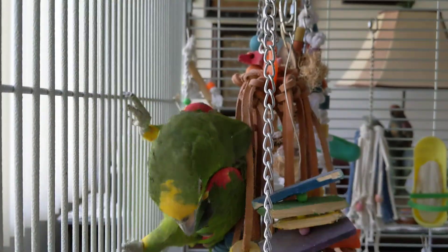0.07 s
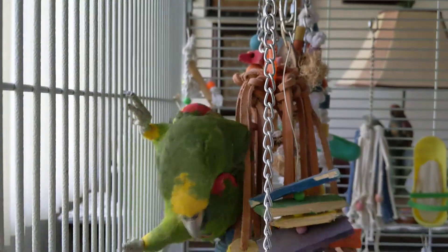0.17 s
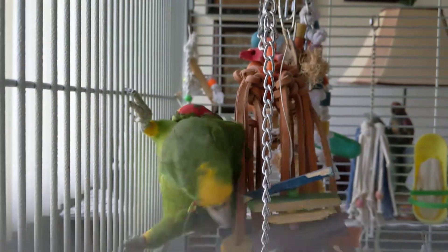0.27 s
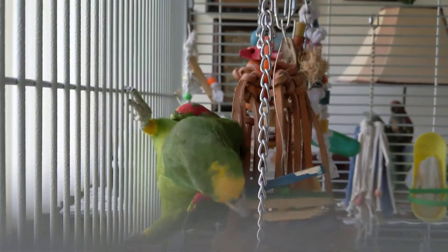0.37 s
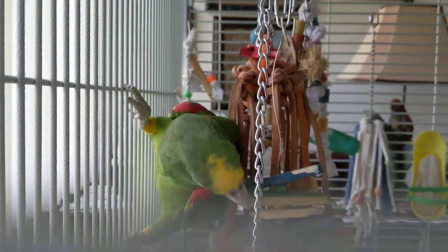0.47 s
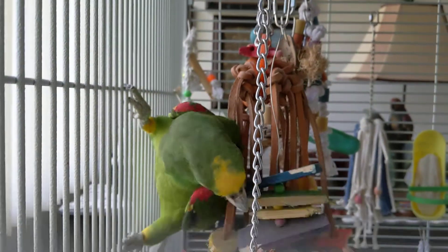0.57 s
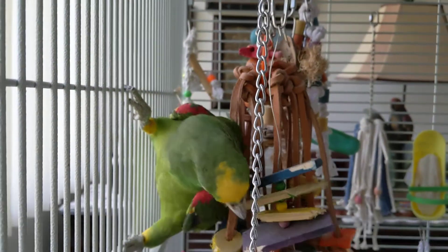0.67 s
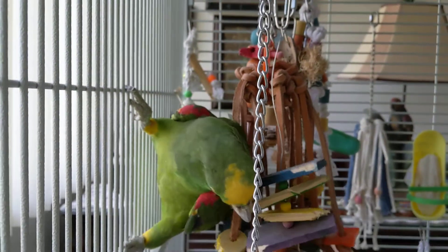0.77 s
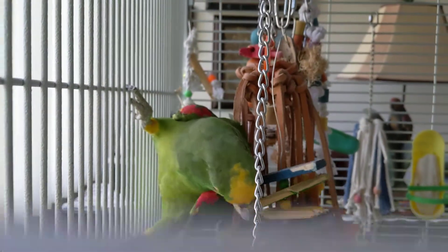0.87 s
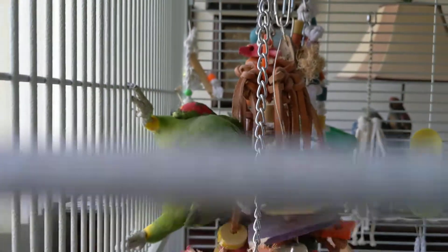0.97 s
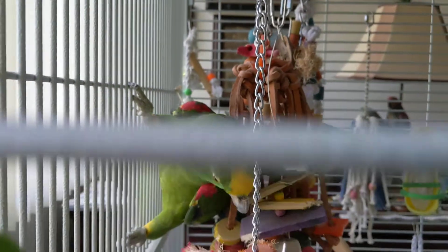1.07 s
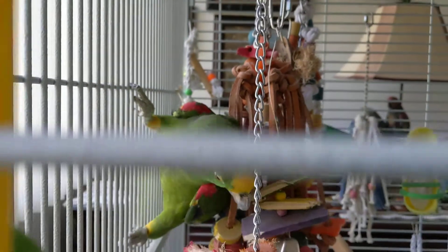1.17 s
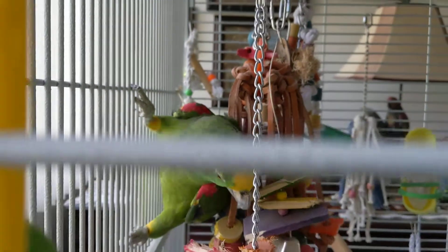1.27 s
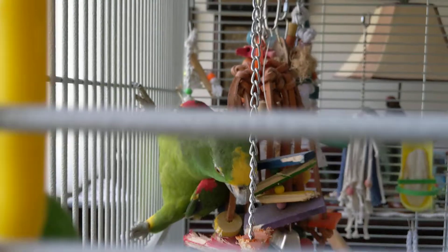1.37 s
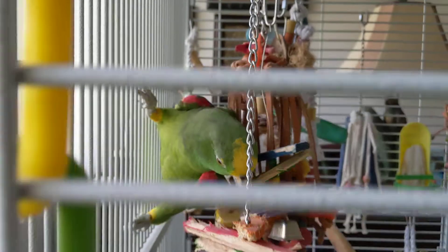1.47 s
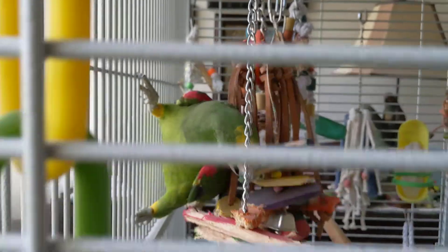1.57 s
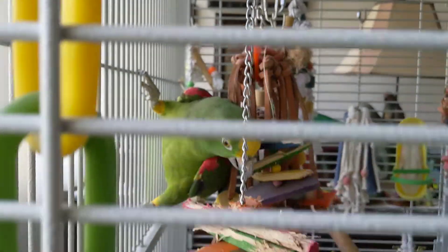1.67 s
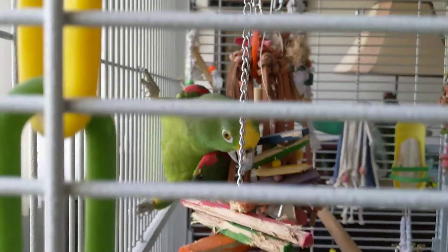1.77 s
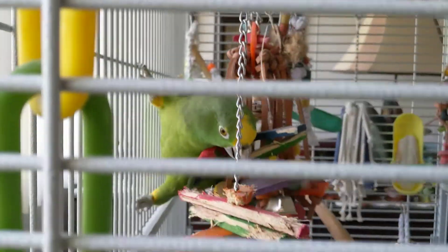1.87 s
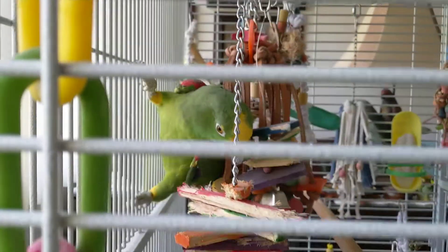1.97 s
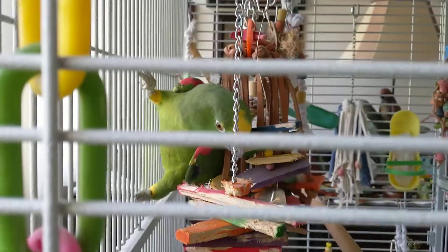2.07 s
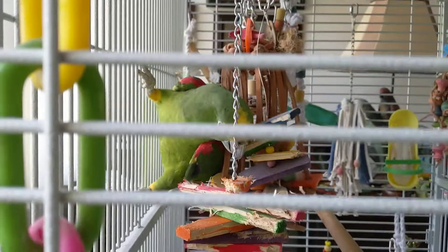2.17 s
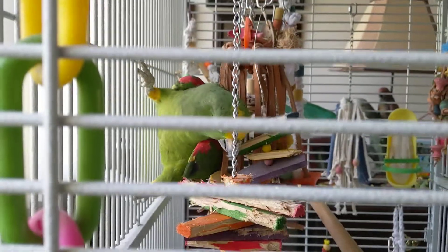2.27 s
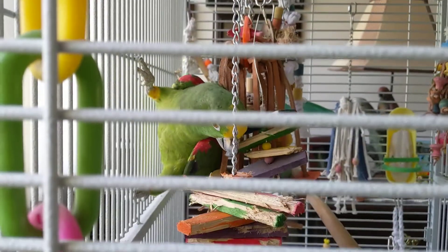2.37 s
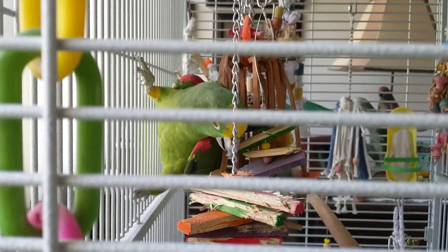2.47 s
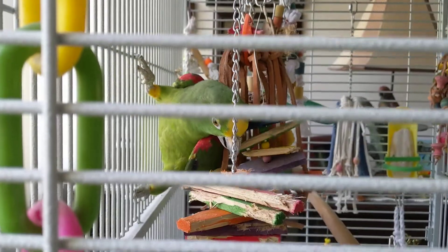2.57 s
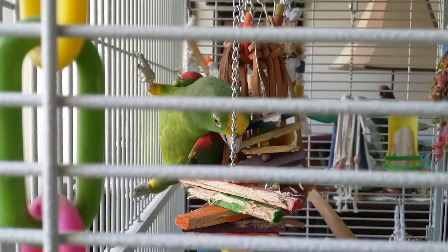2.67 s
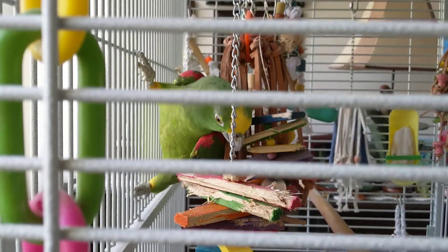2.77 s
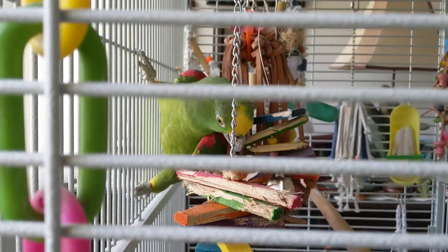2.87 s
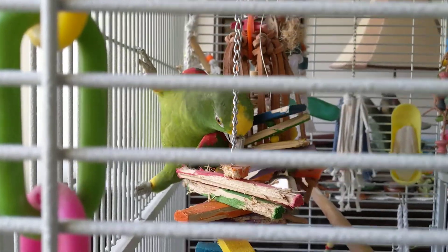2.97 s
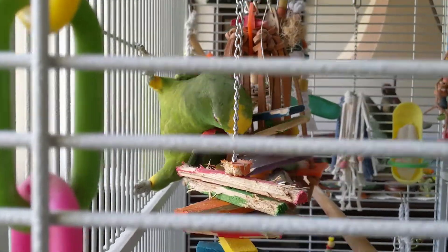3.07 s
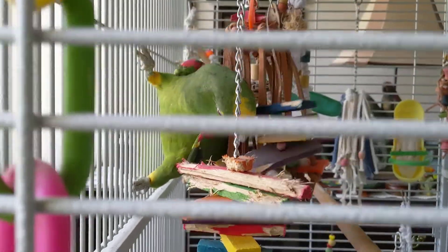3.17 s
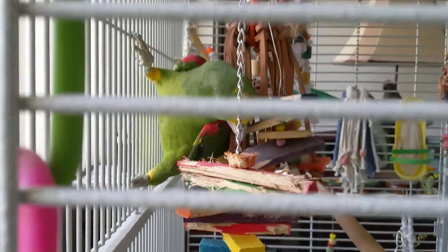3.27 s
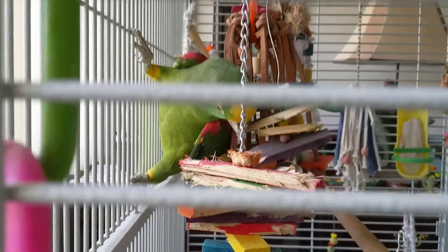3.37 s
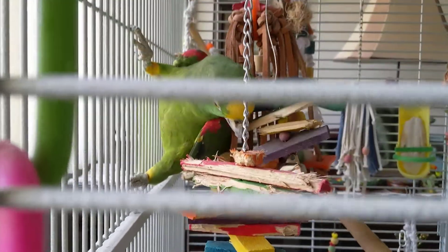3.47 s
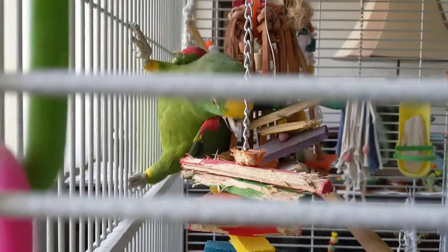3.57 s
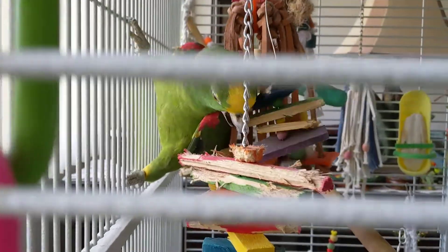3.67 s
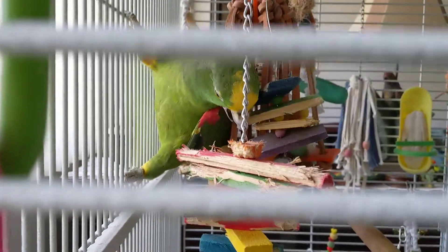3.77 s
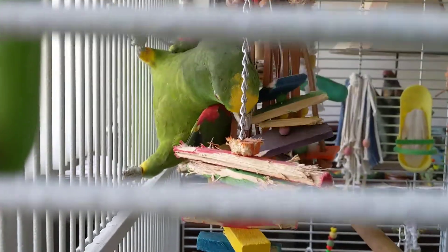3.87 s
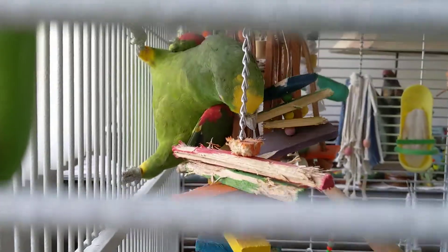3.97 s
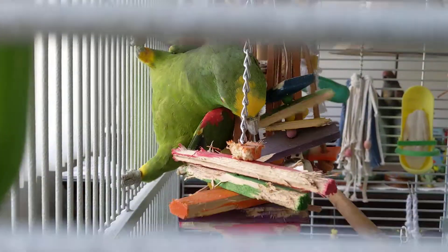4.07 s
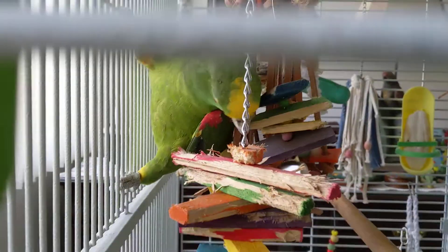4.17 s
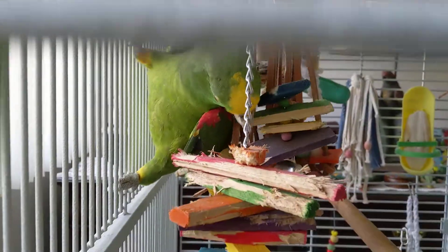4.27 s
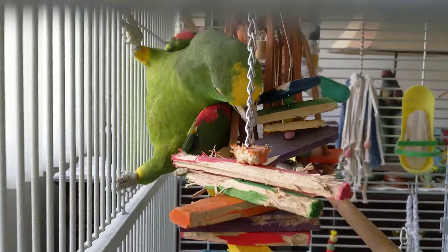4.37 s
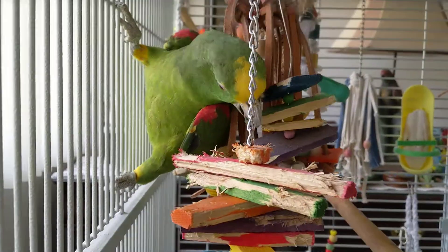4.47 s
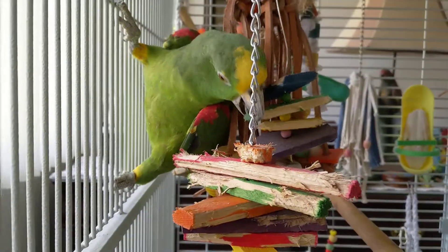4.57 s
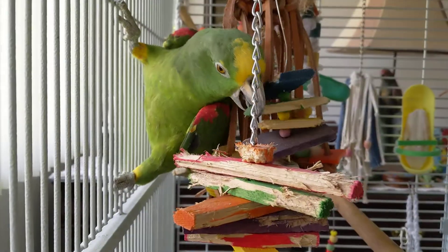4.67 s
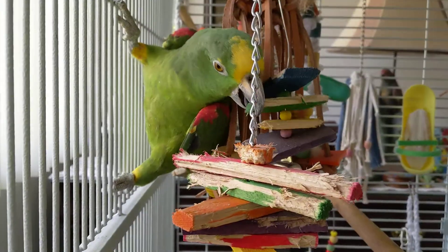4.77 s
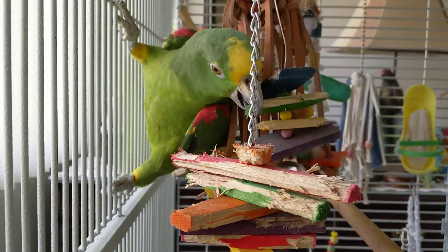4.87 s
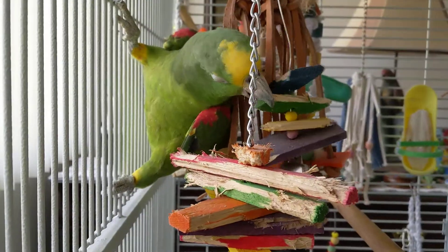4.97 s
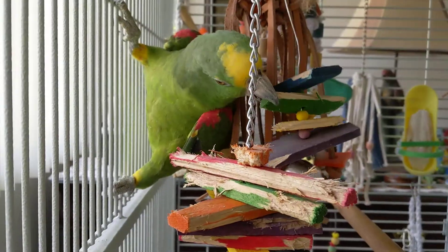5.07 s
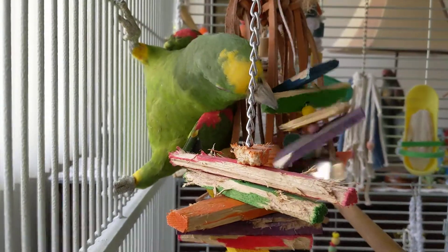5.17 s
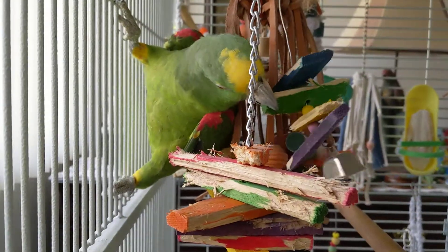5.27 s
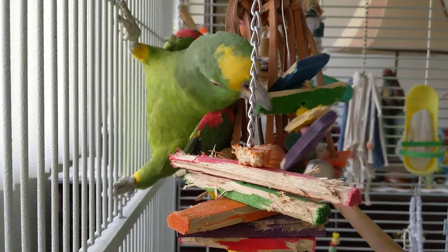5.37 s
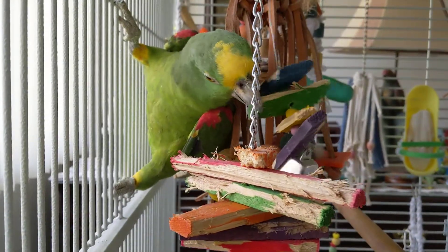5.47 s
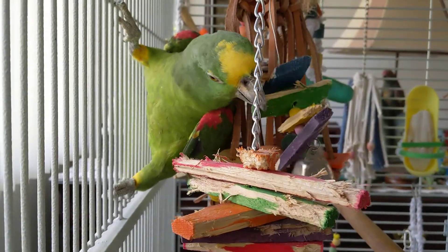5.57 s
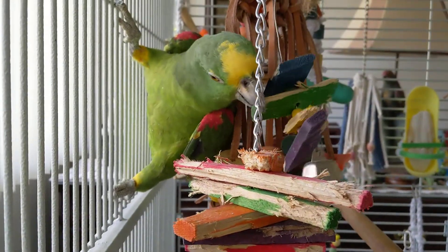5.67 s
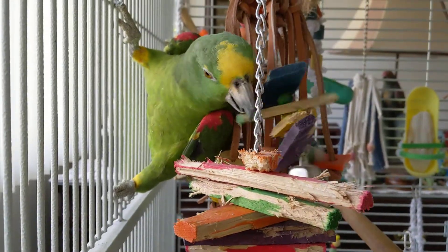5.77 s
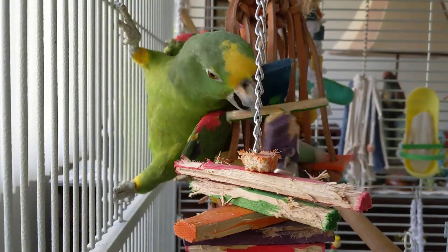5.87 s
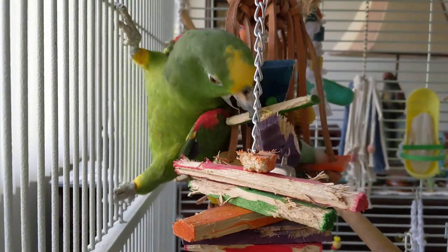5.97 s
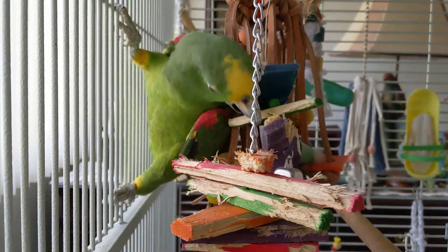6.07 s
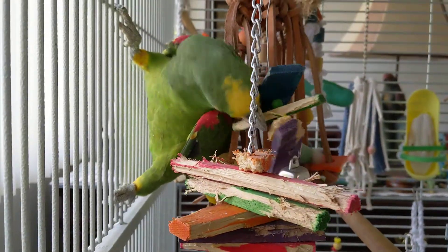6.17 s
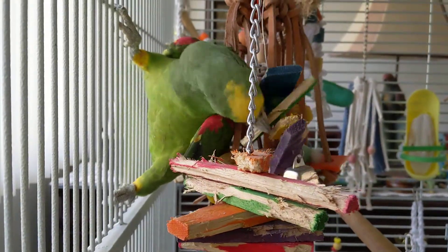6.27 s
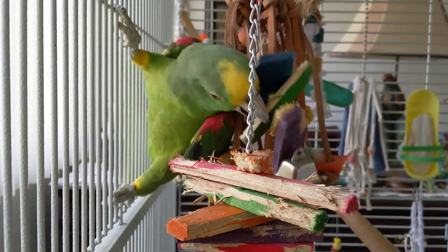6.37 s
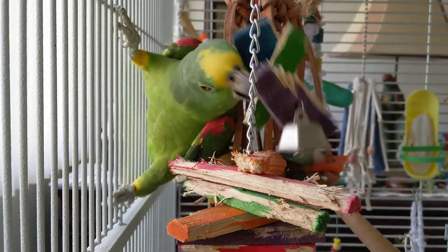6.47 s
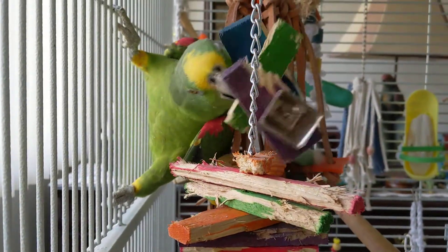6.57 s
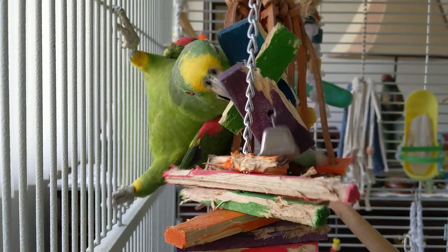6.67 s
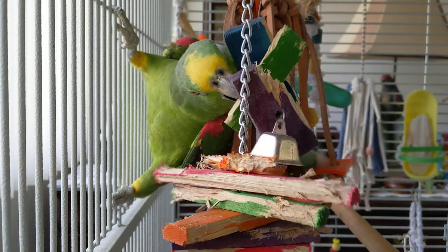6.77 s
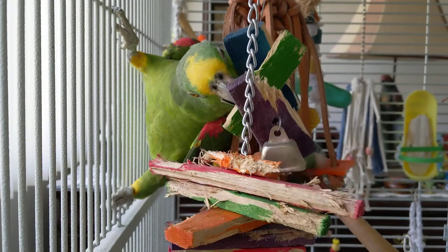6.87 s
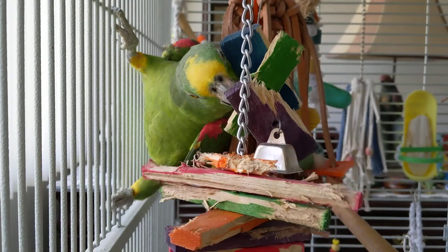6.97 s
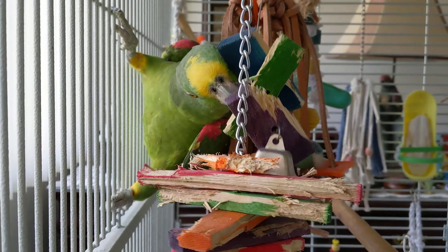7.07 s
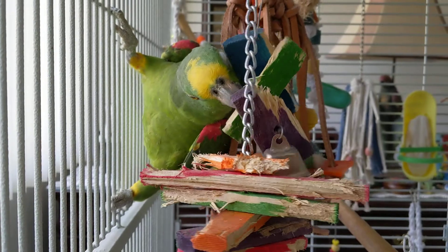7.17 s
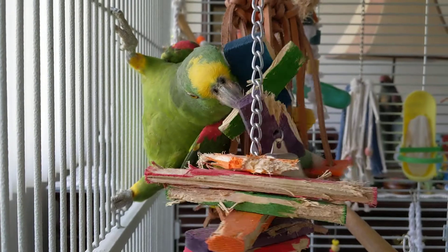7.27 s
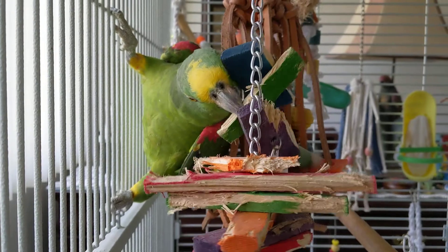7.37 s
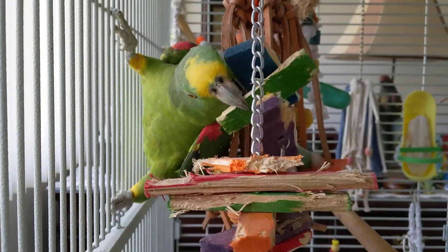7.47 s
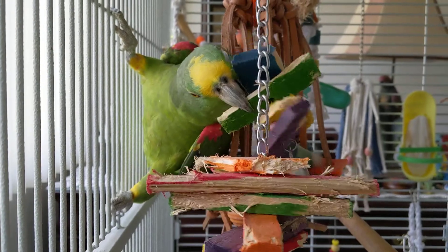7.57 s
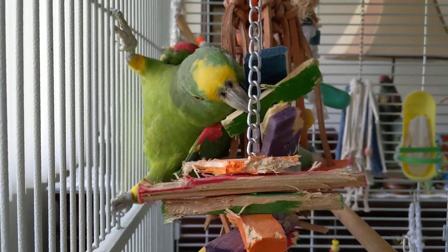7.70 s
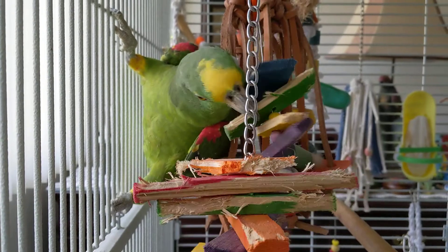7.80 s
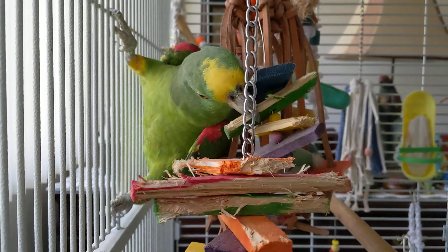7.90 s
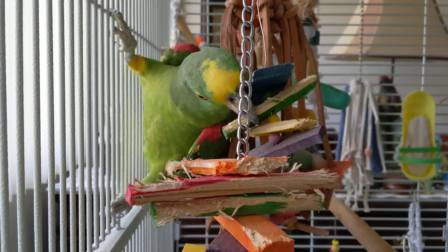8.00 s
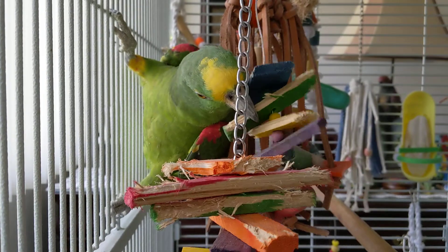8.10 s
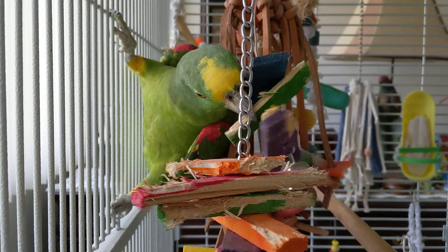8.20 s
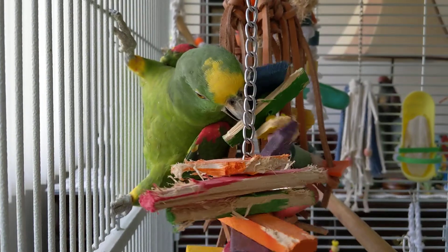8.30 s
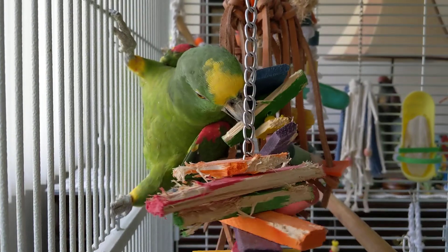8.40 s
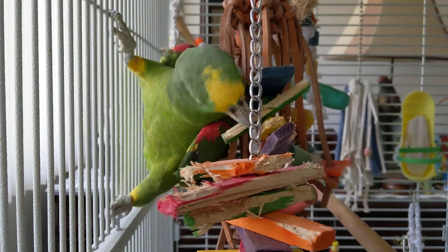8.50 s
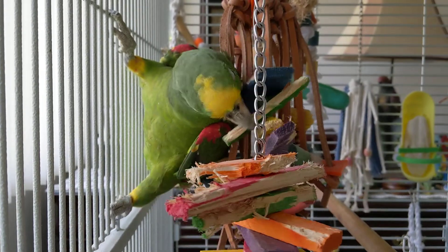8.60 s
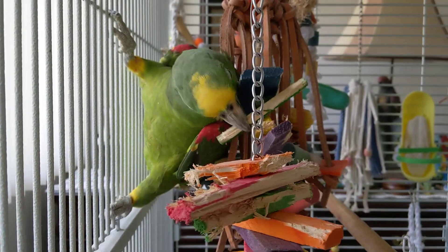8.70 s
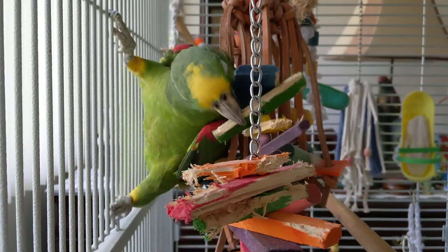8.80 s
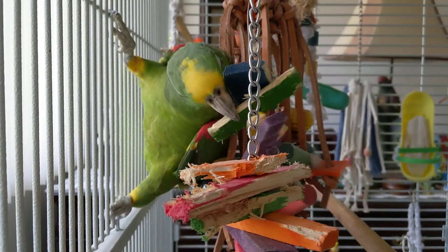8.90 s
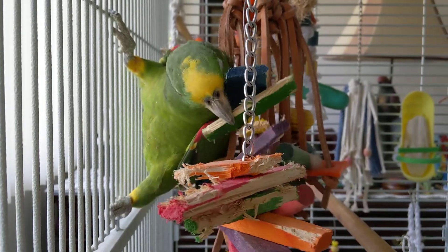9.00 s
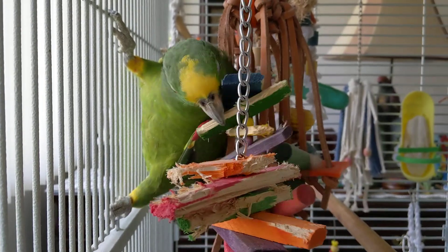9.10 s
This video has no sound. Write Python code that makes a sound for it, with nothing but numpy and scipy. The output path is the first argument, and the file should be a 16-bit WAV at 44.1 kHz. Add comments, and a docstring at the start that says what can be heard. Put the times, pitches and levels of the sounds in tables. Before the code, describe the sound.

Close stereo pickup in a quiet indoor cage. A parrot gnaws and pulls a hanging toy: faint splintery crackles and scrapes, small wooden knocks and metallic chain ticks. A tiny bright bell tinkles softly, grows livelier near the middle, pauses as a hard wooden clack lands, then jangles loudest before fading to tiny tinkles. Soft hiss, room noise and a low engine hum lie beneath.

```python
"""A small metal bell on a hanging toy rings as a parrot tugs and chews the toy's wooden slats, in a cage
indoors, close to a hand-held stereo recorder. The bell is sums of sines set anew by each clapper contact;
chain links tick as noise bursts, slats knock as short sines with rattling modes, and fibres crackle as
clumps of coloured clicks. Below lie room noise, hiss, low rumble and a slowly sinking engine hum."""
import sys
import numpy as np
from scipy import signal
from scipy.fft import rfft, irfft
from scipy.io import wavfile

SR = 44100
rng = np.random.default_rng(int(sys.argv[2]) if len(sys.argv) > 2 else 0)


def magnitude_from_level(level_db):
    """Linear magnitude for a level in decibels (20 dB per decade)."""
    exponent = np.asarray(level_db, float) / 20
    return 10 ** exponent


def persist_wave(psi):
    """Save psi, clipped to +-1, as 16-bit WAV."""
    counts = np.round(np.clip(psi, -1, 1) * 32767).astype(np.int16)
    wavfile.write(sys.argv[1], SR, np.atleast_2d(counts).T)


N = 403074  # samples

# the bell's upper modes in five families, low to high:
# [f/Hz, level against its family/dB, t60/s, phase lead of the left ear/rad]
BELL_MODES = [
    [(4523, 0.5, .42, 1.1), (4562, -16, .15, 1.1)],
    [(7880, -1.5, .125, .8)],
    [(9348, 3.0, .17, 1.1), (9552, -28, .1, 1.8)],
    [(10780, -0.5, .14, 1.6), (12184, -17, .09, 1.5)],
    [(13955, -2.5, .11, 1.5), (13021, -15, .09, 1.5), (14775, -15, .08, 1.5)],
]
LOW_MODE_HZ, LOW_MODE_T60_S = 2461, 0.67  # the bell's lowest mode
# slats and perch knocking: [t/s, strength/dB, f/Hz]
KNOCK_HITS = [(0.025, -30.5, 530), (0.036, -39.5, 510), (1.682, -47.5, 1500), (2.059, -47.5, 1950),
              (2.249, -47, 1570), (2.725, -44, 1950), (2.813, -51.5, 3950), (3.046, -42, 530),
              (3.152, -42.5, 1750), (3.22, -45.5, 1220), (3.45, -39, 555), (3.733, -39.5, 1680),
              (3.948, -45, 2320), (4.046, -41, 530), (4.19, -48.5, 1010), (4.3, -47.5, 563),
              (4.37, -49.5, 1240), (4.8635, -41.5, 3970), (5.134, -42.5, 680), (5.2785, -34, 1700),
              (5.279, -24.5, 880), (5.279, -22, 520), (5.876, -41.5, 600), (5.95, -40.5, 1210),
              (6.129, -41, 554), (6.289, -43.5, 546), (6.414, -44, 556), (6.721, -41.5, 910),
              (7.789, -45.5, 1180), (8.415, -47.5, 1082), (8.488, -48.5, 1299)]
# bouts of chewing and tugging: [t/s, hold/s, bright crackle level/dB, lower scrape level/dB]
CHEWING_BOUTS = [(0.31, 0.085, -70, -71), (0.734, 0.064, -60, -71.5), (1.276, 0.11, -60.5, -66.5),
                 (1.492, 0.052, -64.5, -64.5), (1.65, 0.31, -70, -66.5), (2.015, 0.2, -67, -65.5),
                 (2.17, 0.17, -58, -61), (2.73, .13, -67, -66.5), (3.148, 0.17, -65, -61),
                 (3.373, 0.046, -51.5, -65), (3.528, 0.11, -61.5, -60.5), (3.76, 0.0082, -35.5, -49),
                 (3.9, 0.16, -67, -60), (4.86, 0.019, -64, -62), (5.121, 0.0082, -60, -57),
                 (5.3, 0.015, -60, -58.5), (5.457, 0.064, -66, -66.5), (5.858, 0.017, -53.5, -57),
                 (5.957, 0.0075, -56, -58.5), (6.182, 0.24, -71, -67.5), (6.498, 0.017, -61.5, -63.5),
                 (6.536, 0.045, -59.5, -51), (6.684, 0.018, -48.5, -47.5), (6.71, .012, -44, -44.5),
                 (6.757, .015, -42, -50.5), (6.788, .022, -36.5, -46.5), (6.87, 0.13, -62, -59),
                 (7.013, 0.024, -50, -52.5), (7.102, 0.032, -62, -54.5), (7.2, 0.12, -69.5, -62),
                 (7.387, 0.16, -63.5, -61.5), (7.779, 0.28, -67.5, -67.5), (8.121, 0.19, -68.5, -67),
                 (8.474, 0.17, -69.5, -63), (8.65, 0.11, -62.5, -62), (8.871, 0.019, -52, -60.5),
                 (9.039, .1, -63, -63)]


def rms_one(x):
    """Scale to unit rms."""
    return x / np.sqrt(np.mean(x ** 2) + 1e-20)


def in_time(rows):
    """Table columns as curves over all samples."""
    s, *columns = np.transpose(rows)
    return [np.interp(np.arange(N) / SR, s, c) for c in columns]


def coloured(x, spectrum):
    """Give x a spectrum (Hz, dB) that falls away steeply outside its ends."""
    hz, db = np.transpose(spectrum)
    log_f = np.log(np.arange(N // 2 + 1) * SR / N + 1)
    below = np.clip(log_f - np.log(hz[0]), None, 0)
    above = np.clip(log_f - np.log(hz[-1]), 0, None)
    gain_db = np.interp(log_f, np.log(hz), db) + 30 * (below - above)
    return irfft(rfft(x) * magnitude_from_level(gain_db), N)


def band(x, low_hz, high_hz):
    """Causal band-pass."""
    return signal.sosfilt(signal.butter(2, [low_hz, high_hz], "band", fs=SR, output="sos"), x)


def drift(rate):
    """Slow chance: normal values, rate of them a second, joined by straight lines."""
    knots = rng.standard_normal(N // 64 + 2)
    return np.interp(np.arange(N) / SR * rate, np.arange(len(knots)), knots)


def ring(x, hz, t60):
    """A decaying resonance: a unit click sets a sine of about height 1 ringing."""
    r, w = magnitude_from_level(-60 / (t60 * SR)), 2 * np.pi * hz / SR
    return signal.lfilter([0, np.sin(w)], [1, -2 * r * np.cos(w), r * r], x + 1e-18)


def bursts(times, levels_db, t60):
    """Stereo noise that starts sharply at each time and dies away."""
    clicks = np.zeros(N)
    clicks[(times * SR).astype(int)] = magnitude_from_level(levels_db)
    envelope = signal.lfilter([1], [1, -magnitude_from_level(-60 / (t60 * SR))], clicks + 1e-18)
    shared, own = rng.standard_normal(N), rng.standard_normal((2, N))
    return envelope * (0.37 * shared + 2.79 * own)


def struck(times, levels_db, hz, t60, lead, harder_db=0):
    """A mode whose height each contact sets; a real blow also gives it new phase and a new aim at each ear."""
    # the swinging bell leans left or right: [t/s, left minus right level/dB]
    swing = [(3.5, 4), (3.95, 3.5), (6.72, 1), (6.79, 4.5), (7.01, 0), (7.1, 1.5)]
    soft_below_db, hard_above_db, soft_swell_s = -58, -46, .02
    t = np.arange(N) / SR
    last = np.searchsorted(times, t) - 1
    # a real blow stands 8 dB above what the contact before would have left ringing
    left_db = np.append(-200, levels_db[:-1] - 60 * np.diff(times) / t60)
    blow = np.maximum.accumulate(np.arange(len(times)) * (levels_db > left_db + 8))
    aim = rng.standard_normal((len(times), 3))[blow[last]]
    height = magnitude_from_level(levels_db[last] - 60 * np.abs(t - times[last]) / t60) * (last >= 0)
    # weak contacts swell in, strong ones start almost at once
    hard = np.clip((levels_db[last] + harder_db - soft_below_db) / (hard_above_db - soft_below_db), 0, 1)
    r = np.exp(-1 / (soft_swell_s * SR))
    quick = signal.lfilter([.06], [1, -.94], height * hard)
    slow = signal.lfilter([1 - r], [1, -r], height * (1 - hard))
    pan = magnitude_from_level((1.1 * aim[:, 0] + .5 * in_time(swing)[0]) * [[1], [-1]])
    left_lead = (lead + 0.25 * aim[:, 2]) * np.array([[1], [0]])
    phase = 2 * np.pi * hz * t + np.pi * aim[:, 1] + left_lead
    return (quick + slow) * pan * np.sin(phase)


def bell():
    """The lower three families follow the clapper, the highest two glancing contacts, the lowest mode jolts."""
    # clapper contacts: [t/s, main ring level/dB, face modes level/dB, edge modes level/dB]
    strikes = [(1.672, -50.5, -56, -55.5), (1.6895, -48, -62.5, -68), (1.728, -62.5, -76, -58),
               (2.017, -68, -49, -58), (2.0605, -66, -67, -56), (2.125, -62, -53, -74),
               (2.177, -47, -73, -57), (2.1965, -43.5, -68, -69), (2.258, -56, -48, -48),
               (2.592, -55.5, -74, -86), (2.625, -55, -65, -80), (2.662, -77, -62, -75),
               (2.703, -79, -81, -82), (2.7285, -55, -54, -65), (2.797, -83, -70, -72),
               (3.154, -42, -49, -77), (3.275, -50, -49.5, -66), (3.379, -50, -46, -43),
               (3.471, -50, -51, -68), (3.5271, -27.5, -35, -35), (3.632, -38.5, -52, -68),
               (3.735, -73, -59, -68), (3.7625, -29.5, -45, -27), (3.949, -34.5, -50.5, -52.5),
               (3.995, -53, -68, -65), (4.0366, -57.5, -46, -44), (5.9525, -68, -51, -74),
               (6.0495, -62, -73, -77), (6.101, -68.5, -52, -53.5), (6.141, -62, -74, -52.5),
               (6.498, -70.5, -47, -64), (6.687, -55, -29, -40.5), (6.697, -46.5, -30.5, -39.5),
               (6.7195, -36, -38.5, -42), (6.749, -30.5, -32, -44.5), (6.789, -19, -33, -23.5),
               (6.8027, -39.5, -42.5, -13.5), (6.83, -36.5, -57.5, -26.5), (6.879, -41.5, -57, -68),
               (6.916, -52, -60, -47), (7.0133, -23.5, -20, -50), (7.1022, -27.5, -22, -57),
               (7.446, -55, -50, -65), (7.475, -55.5, -47.5, -65), (7.79, -60.5, -57, -66),
               (7.919, -62.5, -62, -71), (8.117, -57, -52.5, -63), (8.203, -51, -76, -65),
               (8.59, -73, -70, -72), (8.6555, -59, -48.5, -48), (8.726, -59, -50, -62),
               (8.8682, -53, -56, -55), (8.894, -52.5, -57, -69), (9.088, -61, -66, -53.5)]
    # glancing contacts: [t/s, 11 kHz family level/dB, 14 kHz family level/dB]
    glances = [(2.258, -47, -42), (3.154, -61, -48), (3.379, -46, -41), (3.5266, -36, -26),
               (3.7385, -49, -44), (3.7623, -24.5, -37), (4.0366, -52, -46), (6.688, -33, -29),
               (6.7195, -37, -19), (6.7498, -40, -30), (6.7885, -20.5, -30), (7.0124, -29.5, -17.5),
               (7.1025, -29.5, -23), (7.446, -55, -47), (8.6555, -48, -38.5), (8.894, -57, -44)]
    # jolts of the whole toy: [t/s, level/dB]
    jolts = [(1.676, -55.5), (2.175, -52), (2.23, -65), (2.7277, -61), (2.803, -74.5), (3.253, -54),
             (3.733, -48.5), (3.78, -63.5), (3.83, -63.5), (4.002, -50.5), (4.3, -67), (4.4, -64),
             (5.975, -73), (6.03, -67.5), (6.13, -62.5), (6.723, -46), (6.752, -57.5), (7.795, -65),
             (7.835, -61.5), (7.92, -63.5), (8.4941, -61.5), (8.635, -64.5), (8.76, -78.5)]
    strike_s, *clapper = np.transpose(strikes)
    glance_s, *glance = np.transpose(glances)
    jolt_s, jolt_db = np.transpose(jolts)
    drives = [(strike_s, db) for db in clapper] + [(glance_s, db) for db in glance]
    upper = sum(struck(times, levels_db + db, hz, t60, lead)
                for (times, levels_db), modes in zip(drives, BELL_MODES)
                for hz, db, t60, lead in modes)
    return upper + struck(jolt_s, jolt_db, LOW_MODE_HZ, LOW_MODE_T60_S, lead=0.3, harder_db=16.0)


def ticks():
    """Chain and beak: a treble crack and a duller snap for each tick; links ring briefly near 5.7 kHz."""
    # ticks: [t/s, treble crack strength/dB, wood snap strength above it/dB]
    tick_rows = [(1.424, -54, -24), (1.7308, -44.5, -8), (2.019, -49, -24), (2.26, -44, -4),
                 (2.7305, -46.5, -5), (3.223, -65, 14), (3.38, -38.5, -9.5), (3.5263, -35.5, -28),
                 (3.739, -47.5, 2), (3.8945, -44, -20), (4.0365, -40, -15), (4.497, -53.5, -13),
                 (4.866, -47, -3), (5.3048, -43.5, -3), (5.952, -46, -12), (6.053, -49.5, -1.5),
                 (6.527, -40, -8), (6.688, -35, -19), (6.72, -40, -15), (6.751, -46.5, 0),
                 (6.7855, -28, -11), (6.883, -36, -9.5), (7.1022, -27.5, -38), (7.3819, -50.5, -7),
                 (7.4474, -44.5, -29), (7.473, -41.5, -25), (7.609, -52, 0.5), (8.115, -49.5, -10),
                 (8.2055, -44, -23), (8.4929, -44, -19), (8.653, -45, -11)]
    # chain links set ringing: [t/s, strength/dB]
    link_rows = [(1.677, -49.5), (2.1288, -50), (3.382, -44), (3.474, -49.5), (3.6453, -47.5),
                 (3.7354, -47), (3.895, -44), (4.0364, -41.5), (6.529, -48.5), (6.688, -52), (6.721, -44),
                 (6.8846, -46.5), (7.013, -42.5), (7.447, -45.5), (8.1174, -52), (8.8932, -51.5),
                 (9.0876, -50.5)]
    s, crack_db, snap_db = np.transpose(tick_rows)
    link_s, link_db = np.transpose(link_rows)
    touch = bursts(link_s, link_db - 21, 0.011)
    out = sum(ring(touch, hz, t60=.07) for hz in (5570, 5763))
    for db, t60, low, high in [(crack_db, 0.025, 8200, 20400), (crack_db + snap_db, 0.03, 2710, 7200)]:
        narrow_gain = np.sqrt(SR / 8 / (high - low))  # a narrower band is lifted more
        out = out + band(bursts(s, db, t60), low, high) * narrow_gain
    return out


def knocks():
    """A few cycles and the slats' modes shaken by a rattle, more so by hard knocks; deep ones softer, to the left."""
    # slat modes: [f/Hz, level/dB, t60 of the rattling/s]
    slat_modes = [(494, -26, 0.14), (648, -22, 0.2), (789, -20, 0.31), (910, -20.5, 0.3),
                  (986, -17.5, 0.13), (1700, -27.5, 0.35), (1863, -29, 0.38)]
    out, t = np.zeros((2, N + SR)), np.arange(SR // 4) / SR
    rattles = rng.standard_normal((len(KNOCK_HITS), 2, len(t)))
    for (s, db, hz), rattle in zip(KNOCK_HITS, rattles):
        tail = band(rattle, 0.8 * hz, 2 * hz) * magnitude_from_level(-60 * t / .1 - 9)
        crack = band(rattle[0], 940, 3100) * magnitude_from_level(-60 * t / 0.0043 + 10.5)
        airborne = np.clip((hz - 600) / 700, 0, 1)  # 0 for deep knocks, 1 for bright ones
        onset = 1 - np.exp(-t * hz * (1.2 + 5 * airborne))
        decay = magnitude_from_level(-60 * t * hz / (8.5 + (hz / 1200) ** 4))
        hit = np.sin(2 * np.pi * hz * t) * decay * onset
        hardness_db = 0.37 * (db + 22.5)
        slats = sum(magnitude_from_level(d) * ring(rattle * magnitude_from_level(-60 * t / t60 - 19.5 + hardness_db), f, t60=.06)
                    for f, d, t60 in slat_modes)
        wood_gain = np.sqrt(airborne / (1 + (hz / 2500) ** 4))
        sound = hit * np.array([[1.5], [0.81 + 0.5 * airborne]]) + tail
        sound = sound + (slats + crack) * wood_gain * [[1.3], [.8]]
        at = int((s + 0.002) * SR)
        out[:, at:at + len(t)] += magnitude_from_level(db) * sound
    return band(out[:, :N], 300, 12000)


def bumps():
    """Deep knocks reach the recorder's body: a low push and a shudder move its two ports oppositely."""
    deep = [(s, db + 1) for s, db, hz in KNOCK_HITS if hz < 600]
    s, db = np.transpose(deep)
    clicks = np.zeros(N)
    clicks[((s + 0.0027) * SR).astype(int)] = magnitude_from_level(db)
    soft = signal.lfilter([.05], [1, -.95], clicks + 1e-18)
    push = band(ring(soft, hz=423, t60=0.0066), 59, 3000)
    shudder = band(bursts(s + 0.006, db - 19.5, t60=0.88)[0], 187, 450)
    return (push + shudder) * [[1], [-.93]]


def grains(per_s, size_db):
    """Random clicks of very uneven size in clumps, partly shared by both ears."""
    sizes = magnitude_from_level(size_db * np.minimum(rng.exponential(1, (3, N)), 5)) * rng.choice([-1, 1], (3, N))
    born = rng.random((3, N)) < per_s * magnitude_from_level(3 * drift(45)) / SR
    shared, *own = sizes * born
    return 0.5 * shared + np.array(own)


def bites(per_s, t60):
    """Unevenness of chewing: small sudden gives of the wood, each dying fast, over a steady part."""
    gives = (rng.random(N) < per_s / SR) * magnitude_from_level(2.5 * np.minimum(rng.exponential(1, N), 3))
    return rms_one(0.51 + signal.lfilter([1], [1, -magnitude_from_level(-60 / (t60 * SR))], gives + 1e-18))


def bouts(levels_db, idle_db, t60):
    """Height over time: each bout rises, holds and dies away above the idle level."""
    attack_s = 0.0048
    t, out = np.arange(0, N, 32) / SR, magnitude_from_level(idle_db)
    for (start, hold, *_), db in zip(CHEWING_BOUTS, levels_db):
        rise = np.clip((t - start) / attack_s + 1, 0, 1) ** 2
        out = np.maximum(out, rise * magnitude_from_level(db - 60 * np.clip(t - start - hold, 0, None) / t60))
    return np.interp(np.arange(N) / SR, t, out)


def chewing():
    """Fibres tear brightly, beak and chain scrape lower; scraping keeps the bell singing, tugs jangle its clapper."""
    # crackle spectrum: [f/Hz, level/dB]
    crackle_spectrum = [(2000, -50), (4000, 3), (6500, -23.5), (7700, 3.5), (9000, -7), (12000, 4.5),
                        (15500, -4)]
    # scrape spectrum: [f/Hz, level/dB]
    scrape_spectrum = [(1500, -12), (3700, 1.5), (4900, -15.5), (5600, 10.5), (6500, -9), (7500, 3.5),
                       (10000, -64)]
    crackle_db, scrape_db = np.transpose(CHEWING_BOUTS)[2:]
    # faint stirring goes on between bouts
    scraping = bouts(scrape_db, idle_db=-76, t60=0.31)
    tearing = bouts(crackle_db, idle_db=-76, t60=0.17)
    crackle = rms_one(coloured(grains(9000, size_db=6.5), crackle_spectrum)) * tearing
    scrape = rms_one(coloured(grains(7200, size_db=2.5), scrape_spectrum)) * scraping
    # sparser clicks drive the bell: tugs its upper families, scraping its main ring and lowest mode
    jangling = rms_one(grains(90, size_db=3.0)) * np.minimum(tearing, magnitude_from_level(-45))
    rubbing = rms_one(grains(300, size_db=4.0)) * np.clip(scraping - magnitude_from_level(-72), 0, magnitude_from_level(-63))
    singing = sum(magnitude_from_level(db) * ring(rubbing, hz, t60) for hz, db, t60, lead in BELL_MODES[0])
    sparkle = sum(magnitude_from_level(db) * ring(jangling, hz, t60)
                  for modes in BELL_MODES[1:] for hz, db, t60, lead in modes)
    low_singing = ring(rubbing, LOW_MODE_HZ, LOW_MODE_T60_S)
    wood = (crackle + scrape) * bites(65, t60=0.035)
    return wood + magnitude_from_level(-34.5) * singing + magnitude_from_level(-36.5) * sparkle + magnitude_from_level(-43.5) * low_singing


def tone(start, end, from_hz, to_hz, db, wobble):
    """A wavering sine that swells and fades."""
    way = np.clip((np.arange(N) / SR - start) / (end - start), 0, 1)
    hz = (from_hz + (to_hz - from_hz) * way) * (1 + wobble * drift(180))
    return magnitude_from_level(db) * np.sqrt(4 * way * (1 - way)) * np.sin(2 * np.pi * np.cumsum(hz) / SR)


def squeaks():
    """Thin squeaks of beak on wood: short wavering sines that glide upward."""
    # squeaks: [start t/s, end t/s, from f/Hz, to f/Hz, level/dB]
    squeak_rows = [(6.294, 6.337, 6900, 7400, -58), (6.35, 6.423, 6940, 7620, -62),
                   (8.497, 8.537, 7360, 7630, -60)]
    return sum(tone(*row, wobble=0.011) for row in squeak_rows)


def room(x):
    """A diffuse tail: decaying noise, another for each ear."""
    t = np.arange(SR // 2) / SR
    tail = rng.standard_normal((2, len(t))) * magnitude_from_level(-60 * t / 0.32) * (t > .004)  # t60 0.32 s
    return signal.fftconvolve(x, tail / np.sqrt(np.sum(tail[0] ** 2)), axes=1)[:, :N]


def surroundings():
    """Engine hum and rumble alike in both ears, handling thuds mostly so, room noise partly, hiss unrelated."""
    # the background's course: [t/s, engine f/Hz, rumble level/dB, room noise level/dB]
    around = [(0, 66.8, -63, -71), (4.2, 67, -57, -69.5), (5.4, 65.4, -60, -66), (6.3, 66.1, -56, -67.5),
              (6.6, 66.46, -50.5, -62.5), (7.13, 63.4, -45, -61), (7.5, 63.75, -47.5, -67),
              (8, 62.9, -49, -70.5), (9.14, 61.8, -51.5, -65)]
    # faint steady hums that come and go: [start t/s, end t/s, f/Hz, level/dB]
    hum_rows = [(2.28, 3.748, 217.6, -71.5), (3.942, 4.547, 182.4, -67), (5.9, 6.66, 182.3, -70),
                (8.424, 9.14, 303, -65)]
    # hiss spectrum: [f/Hz, level/dB]
    hiss_spectrum = [(1000, 6), (1300, -7.5), (2000, -4), (3900, -2), (4800, -7), (5700, -3.5), (8000, -10),
                     (10800, -7), (14700, 2)]
    # room noise spectrum: [f/Hz, level/dB]
    room_spectrum = [(80, -20), (105, 3), (130, 3.5), (190, 3.5), (400, 1.5), (950, 0.5), (1150, -7),
                     (1600, -12.5)]
    engine_hz, rumble_db, room_db = in_time(around)
    # the engine grows with the rumble and wavers in level and pitch
    engine_db = -62 + 0.64 * np.clip(rumble_db + 57.0, 0, None) + 3.2 * drift(21.0)
    engine_phase = 2 * np.pi * np.cumsum(engine_hz * (1 + 0.0089 * drift(23))) / SR
    engine = magnitude_from_level(engine_db) * np.sin(engine_phase)
    rumble = magnitude_from_level(rumble_db) * rms_one(band(band(rng.standard_normal(N), 3.1, 50), 10.9, 56))
    # thuds rise far more steeply than the rumble
    thuds_db = 2.5 * (rumble_db + 45) - 58 + 3 * drift(16)
    thuds = magnitude_from_level(thuds_db) * rms_one(band(rng.standard_normal(N), 70, 400)) * [[1], [.6]]
    mid, side = coloured(rng.standard_normal((2, N)), room_spectrum)
    room_noise = magnitude_from_level(room_db + [[2.5], [-.8]]) * rms_one(1.63 * mid + side * [[1], [-1]])
    hiss_db = -70 + np.array([[1.2], [-1.2]])
    hiss = magnitude_from_level(hiss_db) * rms_one(coloured(rng.standard_normal((2, N)), hiss_spectrum))
    hums = sum(tone(start, end, hz, hz, db, wobble=0.0029) for start, end, hz, db in hum_rows)
    return engine + rumble + thuds + room_noise + hiss + hums * [[1], [.7]]


def scene():
    """The toy with its room, then the surroundings."""
    ringing = bell()
    toy = ticks() + knocks() + bumps() + chewing() + squeaks()
    reverberant = room(magnitude_from_level(-11) * toy + magnitude_from_level(-26) * ringing)
    return toy + ringing + reverberant + surroundings()


def low_pass(x):
    """Removes everything above the highest recorded frequency."""
    return signal.sosfilt(signal.butter(12, 16800, fs=SR, output="sos"), x)


def record(dry):
    """The recorder cuts the treble steeply near 16 kHz."""
    cut = signal.sosfilt(signal.cheby2(12, 28, 16100, fs=SR, output="sos"), dry)
    return low_pass(cut)


dry = scene()
out = record(dry)
persist_wave(out)
```